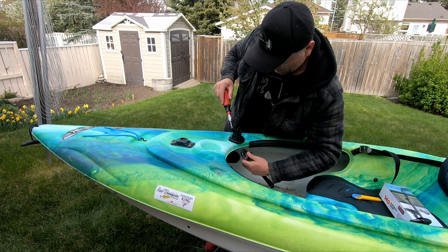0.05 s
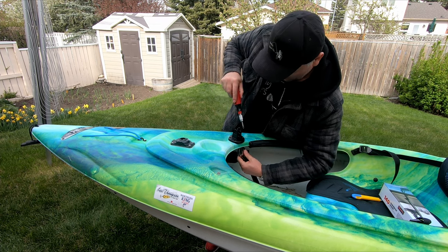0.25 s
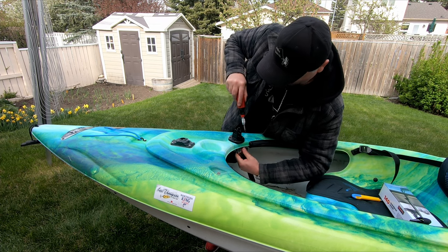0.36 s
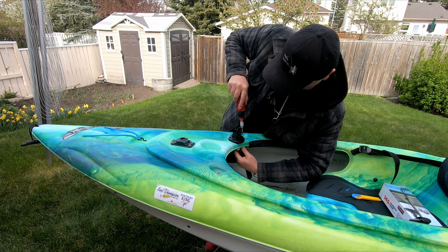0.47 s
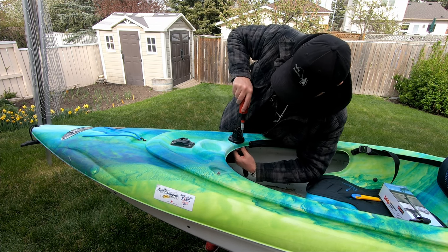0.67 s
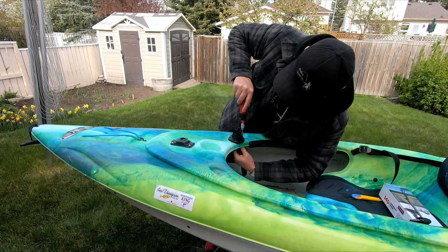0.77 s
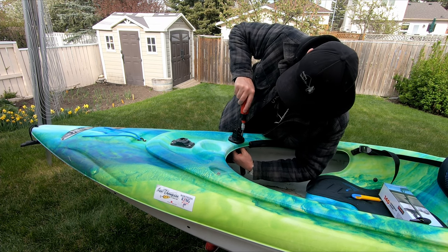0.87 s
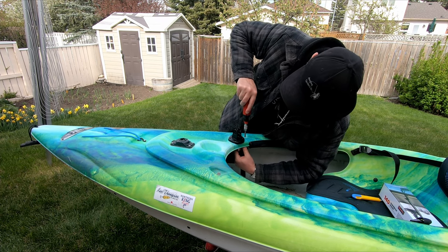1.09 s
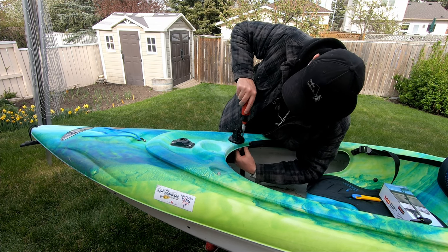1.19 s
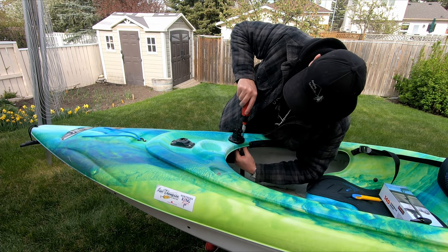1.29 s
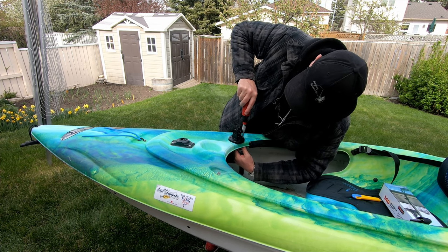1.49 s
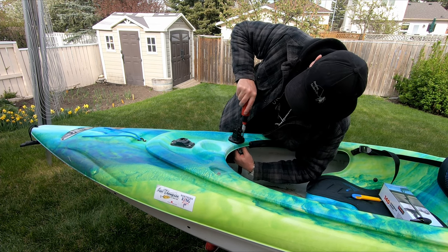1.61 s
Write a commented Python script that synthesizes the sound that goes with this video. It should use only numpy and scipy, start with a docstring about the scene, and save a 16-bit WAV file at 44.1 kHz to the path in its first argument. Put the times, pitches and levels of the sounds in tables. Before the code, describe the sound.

Sharp screwdriver clicks with hollow knocks on a plastic kayak deck outdoors.

```python
"""Faint ticks and rubbing come first, over a low hum, a town wash and a thin far whistle in a yard.
A hand presses a screwdriver into screws on a hollow plastic kayak deck. The tip clicks and slips
in the screw head, exciting short resonances of tip and deck; each knock sets the hull booming in
its normal modes; sleeve and hand rub the deck with friction noise. The kayak is heard through
two microphone ports that differ in level, phase and near echoes."""
import sys
import numpy as np
from scipy import signal
from scipy.fft import rfft, irfft
from scipy.io import wavfile
from scipy.ndimage import uniform_filter1d

SR = 44100
rng = np.random.default_rng(int(sys.argv[2]) if len(sys.argv) > 2 else 0)


def waveform_to_disk(signal):
    """Save audio, clipped to [-1, 1], as 16-bit WAV at the path in sys.argv[1]."""
    frames = np.transpose(np.atleast_2d(signal))
    scaled = np.clip(frames, -1, 1) * 32767
    samples = np.round(scaled).astype(np.int16)
    wavfile.write(sys.argv[1], SR, samples)


N = 72765

# normal modes of the hull: f/Hz, level/dB, t60/s, build-up/s
HULL_MODES = [(81.9, -7.5, 0.34, 0.011), (107.7, -18, 0.47, 0.017), (155.9, -4, 0.26, 0.0071),
              (186.9, -10.5, 0.17, 0.019), (235, -8.5, 0.084, 0.011), (282.3, -13, .1, 0.009),
              (317.5, -16, 0.14, 0.009), (356.5, -22.5, 0.057, 0.0029), (465.7, -21, 0.084, 0.0057),
              (534.7, -20.5, 0.036, 0.0024), (691, -26.5, 0.068, 0.00068)]


def amp(db):
    return 10 ** (np.asarray(db) / 20)


def unit_rms(x):
    return x / np.sqrt(np.mean(x ** 2) + 1e-20)


def at_frequency(points, hz):
    f, value = np.transpose(points)
    return np.interp(np.log(hz + 1), np.log(f + 1), value)


def over_time(table, column):
    rows = np.array(table)
    return np.interp(np.arange(N) / SR, rows[:, 0], rows[:, column])


def add(mix, start_s, sound):
    part = mix[round(start_s * SR):][:len(sound)]
    part += sound[:len(part)]


def filtered(x, gain):
    """Linear filtering: the spectrum of x, mirrored at its ends, is multiplied by gain(f)."""
    padded = np.concatenate([x[..., 1024:0:-1], x, x[..., -2:-1026:-1]], axis=-1)
    size = padded.shape[-1]
    return irfft(rfft(padded) * gain(np.fft.rfftfreq(size, 1 / SR)), size)[..., 1024:-1024]


def causal_filter(x, gain):
    """Causality: a minimum-phase filter of unit RMS gain answers only after it is struck."""
    log_gain = np.log(np.maximum(unit_rms(gain), 1e-6))
    log_response = np.conj(signal.hilbert(np.r_[log_gain, log_gain[-2:0:-1]]))[:len(gain)]
    return irfft(rfft(x) * np.exp(log_response), len(x))


def lorentzian(hz, centre_hz, width_hz):
    """Power response of a damped resonance."""
    return 1 / (1 + (2 * (hz - centre_hz) / width_hz) ** 2)


def resonate(x, hz, width_hz):
    """Forced vibration of one damped resonance of gain 1."""
    phasor = np.exp(2j * np.pi * hz * np.arange(len(x)) / SR)
    pole = np.exp(-np.pi * width_hz / SR)
    return 2 * (phasor * signal.lfilter([1 - pole], [1, -pole], x / phasor)).real


def town_wash():
    """Partial coherence: patchy town noise is alike left and right only at low frequencies."""
    spectrum = [(35, -15), (60, 0), (90, -17), (146, -9.5), (300, -24.5), (599, -36), (777, -24.5),
                (945, -32.5), (1430, -33.5), (2250, -44), (2860, -43.5), (3120, -46), (3470, -49),
                (5200, -54.5), (7270, -59), (9000, -59.5), (10700, -80), (12000, -89.5), (15000, -97)]  # town noise: f/Hz, relative level/dB
    coherence = [(60, .96), (130, .88), (290, .6), (430, .34), (640, .08)]  # likeness of the two sides: f/Hz, correlation
    balance = [(60, -1), (400, -1.5), (1400, -3), (3100, -3), (4700, 0)]  # left minus right: f/Hz, level/dB
    frames, hz = N // 256 + 5, np.fft.rfftfreq(1024, 1 / SR)
    a, b, c, d, patches = rng.standard_normal((frames, 513, 5)).T
    patches = uniform_filter1d(patches, size=12, axis=0)  # across frequency
    patches = unit_rms(uniform_filter1d(patches, size=14, axis=1))  # across time
    alike = at_frequency(coherence, hz)[:, None]
    left = a + 1j * b
    right = alike * left + np.sqrt(1 - alike ** 2) * (c + 1j * d)
    pan_db = at_frequency(balance, hz)[:, None] / 2
    level_db = at_frequency(spectrum, hz)[:, None] + 2.2 * patches
    spectra = np.array([left, right]) * amp([level_db + pan_db, level_db - pan_db])
    return amp(-54.5) * unit_rms(signal.istft(spectra, nperseg=1024, noverlap=768)[1][:, :N])


def low_hum(hz=46, waver_hz=4.2):
    """Random frequency modulation: a low tone wavers as its level rises and falls."""
    levels = [(0.0, -58), (0.032, -54.5), (0.372, -43.5), (0.422, -80), (0.472, -36), (0.536, -42),
              (0.564, -52.5), (0.61, -48), (0.648, -59), (1.378, -48.5), (1.396, -52), (1.65, -53.5)]  # hum envelope: t/s, level/dB
    drift = unit_rms(uniform_filter1d(rng.standard_normal(N), size=4000))
    phase = 2 * np.pi * np.cumsum(hz + waver_hz * drift) / SR
    return np.sqrt(2) * np.sin(phase) * amp(over_time(levels, 1))


def far_whistle(start_s=0.4, end_s=1.5, hz=3107, width_hz=33, level_db=-81):
    """Narrow-band noise is heard as a pitch; it swells and fades."""
    progress = np.clip((np.arange(N) / SR - start_s) / (end_s - start_s), 0, 1)
    band = resonate(resonate(rng.standard_normal(N), hz, width_hz), hz, width_hz)
    return amp(level_db) * np.sqrt(np.sin(np.pi * progress)) * unit_rms(band)


def rubbing():
    """Sliding friction: fine grains scrape in three bands; slower shoves drive the hull modes."""
    # sleeve and hand on the deck: t/s, level/dB of low, mid and high scrape, relative rumble level/dB
    levels = [(0, -91, -105, -100, -74), (.18, -77, -100, -100, -70), (.23, -66, -78, -94, -68),
              (.32, -68.5, -95.5, -104, -62), (.43, -65, -78, -100, -66), (.52, -74, -65, -87, -53),
              (.62, -65.5, -82, -94, -68), (.67, -66, -73.5, -79.5, -60), (.74, -72, -71.5, -82, -54.5),
              (.79, -72.5, -91, -89.5, -63.5), (.83, -73.5, -84, -100, -48.5),
              (.87, -64.5, -70.5, -103, -66), (.91, -64, -76.5, -106, -64), (.96, -102, -105, -102, -53),
              (1.015, -61.5, -68.5, -96, -65), (1.13, -66, -74, -90, -66), (1.19, -70, -92, -100, -70),
              (1.29, -65, -90, -106, -74), (1.4, -61.5, -79, -89, -65.5), (1.46, -70, -77.5, -100, -58),
              (1.54, -62, -89, -122, -57), (1.65, -71, -77, -100, -57.5)]
    spectrum = [(240, -49.5), (400, -0.5), (965, -6.5), (1540, -4.5), (1750, -14), (2060, -11.5),
                (3200, -18), (3570, -19), (3880, -22), (4270, -20.5), (6190, -21), (8160, -11),
                (10700, -40.5), (14000, -71.5), (22000, -120)]  # scrape: f/Hz, relative level/dB
    grains = rng.standard_normal(N) * amp(1.92 * rng.exponential(1, N // 40 + 1).repeat(40)[:N])
    shove = filtered(rng.standard_normal(N), lambda hz: 1 / (1 + (hz / 450) ** 4))
    rumble = sum(amp(db) * resonate(shove, hz, 1.06 / t60) for hz, db, t60, _ in HULL_MODES)
    out = unit_rms(rumble) * amp(over_time(levels, 4) - 4.5)
    for column, (low_hz, high_hz) in enumerate([(300, 2500), (2500, 6200), (6200, 11000)], 1):
        band = filtered(grains, lambda f: amp(at_frequency(spectrum, f)) * (f > low_hz) * (f <= high_hz))
        out += unit_rms(band) * amp(over_time(levels, column))
    return out


def hull_knock(level_db, nominal_hz, swell_s, deep_db, upper_db):
    """Modal superposition: hull modes build up and ring out as the dented deck bonks, sinking in pitch."""
    t = np.arange(SR // 3) / SR
    pitch_hz = 1.1577 * nominal_hz / (1 + 11.76 * t)
    swell = (t / swell_s * np.exp(1 - t / swell_s)) ** 1.255
    bonk = swell * np.sin(2 * np.pi * np.cumsum(pitch_hz) / SR)
    boom = np.zeros(len(t))
    for k, (hz, db, t60, build_s) in enumerate(HULL_MODES):
        mode_db = db + deep_db * (hz < 135) + upper_db * (hz > 250)
        envelope = amp(mode_db - 60 * t / t60) * (1 - np.exp(-t / build_s)) ** 2
        boom += (-1) ** k * envelope * np.sin(2 * np.pi * hz * t)
    return amp(level_db - 2.5) * (bonk + boom)


def tip_click(level_db, ring_hz, ring_db, bite_db, treble_db, burst_t60):
    """Impact excitation: a gritty burst drives tip and deck, with a steel crack and one short ring."""
    tip_spectrum = [(240, -32), (400, 1.5), (478, -6), (841, -9), (1270, -8), (1630, -10), (2240, -16),
                    (2640, -11.5), (3770, -20), (4040, -20), (6450, -26.5), (8270, -33.5), (10700, -48.5),
                    (14000, -77.5), (22000, -120)]  # slipping tip: f/Hz, relative level/dB
    deck_modes = [(580, 92, 4.5), (674, 21, 2), (1077, 29, -3), (1244, 185, 2.5), (1940, 100, 5),
                  (2576, 270, -0.5), (3455, 180, 3.5), (4250, 340, 1.5), (5120, 600, 4), (8300, 210, -13)]  # resonances under the tip: f/Hz, bandwidth/Hz, level/dB
    crack_spectrum = [(2000, -15), (4300, 4), (6300, -18.5), (8300, 2), (10500, -7.5), (11500, -19.5),
                      (14000, -31.5), (16000, -55.5)]  # first touch of steel on steel: f/Hz, relative level/dB
    rise_s, tail_t60, crack_t60, puff_t60 = 0.00092, 0.14, 0.013, 0.0088
    treble_lift_db, bite_lift_db = treble_db + 26.5, bite_db + 13.5
    slip_noise, grit_noise, touch_noise = rng.standard_normal((3, 6000))
    t, hz = np.arange(6000) / SR, np.fft.rfftfreq(6000, 1 / SR)
    rise = 1 - np.exp(-t / rise_s)

    shelf = np.clip(4 * np.log2(hz / 5000 + 1e-9), 0, 1)
    lift_db = treble_lift_db * shelf + bite_lift_db * lorentzian(hz, 4280, 2170) ** 2
    deck = 1 + sum(amp(db) * lorentzian(hz, f, width) for f, width, db in deck_modes)
    colour = amp(at_frequency(tip_spectrum, hz) + lift_db) * deck
    grit = amp(3 * unit_rms(uniform_filter1d(grit_noise, size=30)))
    decay = grit * amp(-60 * t / burst_t60) + amp(-10 - 60 * t / tail_t60)
    burst = causal_filter(slip_noise * rise * decay, colour)

    touch = touch_noise * rise * amp(-18 + treble_lift_db - 60 * t / crack_t60)
    crack = causal_filter(touch, amp(at_frequency(crack_spectrum, hz)))

    puff = np.convolve(touch_noise * rise ** 2 * amp(-60 * t / puff_t60), np.hanning(9), "same")
    ring = resonate(puff, ring_hz, width_hz=400)
    ring = resonate(ring, ring_hz, width_hz=900)  # steepens the skirts
    return amp(level_db) * (.5 * (burst + crack) + amp(ring_db) * ring / abs(ring).max())


def microphone_ports(x, echo_t60=.015):
    """Spaced receivers: two ports differ in level and phase, and each catches its own near echoes."""
    balance = [(60, -1.5), (230, -1.5), (520, -3), (690, -6), (1180, -5), (2660, -6.5), (3480, -6.5),
               (4570, .5), (7850, 3), (10300, -3)]  # direct sound, left minus right: f/Hz, level/dB
    left_lead = [(0, 0), (520, -.3), (2760, -.5), (4050, -.3), (4700, -1.1), (5510, -2.9), (6500, -3),
                 (7580, -4.9), (8270, -5.9), (9220, -6.8), (11000, -6.6)]  # direct sound, left minus right: f/Hz, phase/rad
    echo_spectrum = [(100, -40), (300, -22), (600, -7), (2000, -7), (8000, -7), (12000, -3)]  # incoherent echoes: f/Hz, relative level/dB

    def left_gain(hz):
        return amp(at_frequency(balance, hz) / 2) * np.exp(.5j * at_frequency(left_lead, hz))

    t = np.arange(2048) / SR
    response = rng.standard_normal((2, len(t))) * amp(-60 * t / echo_t60)
    echoes = signal.fftconvolve(x[None], response / np.linalg.norm(response[0]), axes=1)[:, :N]
    direct = np.array([filtered(x, left_gain), filtered(x, lambda hz: 1 / left_gain(hz))])
    return direct + filtered(echoes, lambda hz: amp(at_frequency(echo_spectrum, hz)))


def scene():
    """Superposition: rubbing, clicks and knocks on the kayak add to the background of the yard."""
    # tip in the screw head: t/s, level/dB, ring f/Hz, ring level/dB, bite level/dB (neutral at -13.5),
    # treble level/dB (neutral at -26.5), burst t60/s
    clicks = [(0.077, -75, 1970, -11.5, 2, -23, 0.014), (0.133, -67, 1720, -16, -10, -5.5, 0.023),
              (0.199, -59.5, 2200, -9, -14, -9.5, 0.02), (0.208, -51.5, 1850, -28.5, -20, -23, 0.025),
              (0.456, -17, 1890, -17, -22.5, -26, 0.017), (0.478, -29, 2090, -13, -16, -20, 0.027),
              (0.507, -28.5, 3950, -12.5, -8, -11.5, 0.02), (0.518, -34.5, 1970, -6, -17.5, -41, 0.075),
              (0.537, -35, 2150, -8, -15, -20, 0.025), (0.546, -34.5, 2670, -8, -15, -28, 0.025),
              (0.567, -41.5, 1910, -12, -23, -35, 0.0083), (0.653, -39.5, 2030, -26, -18.5, -28.5, 0.025),
              (0.66, -41, 3220, 0, -12.5, -27.5, 0.018), (0.709, -46.5, 1970, -4.5, -17, -26, 0.0083),
              (0.733, -60, 2030, -10, -16, -11, 0.0086), (0.885, -47, 1750, -18.5, -20, -49.5, 0.019),
              (1.023, -28.5, 1690, -10, -21, -23, 0.022), (1.067, -38.5, 1740, -12, -20, -31, 0.058),
              (1.082, -45.5, 1930, 3.5, -13, -17, 0.042), (1.092, -35.5, 1820, -9, -16, -27, 0.065),
              (1.097, -43, 1850, -28, -10, -29, 0.042), (1.109, -43.5, 2160, 2, -24, -22, 0.016),
              (1.139, -56, 2120, 3, -24, -36, 0.011), (1.227, -69, 2250, 9, -20, -53, 0.037),
              (1.247, -30.5, 1930, -14, -23.5, -31.5, 0.016), (1.312, -52.5, 2300, 4.5, -11, -24, 0.075),
              (1.339, -33, 2000, -6.5, -11, -23.5, 0.033), (1.346, -33.5, 1920, -16, -24.5, -47, 0.025),
              (1.358, -48.5, 1870, 2, -27, -34, 0.025), (1.394, -50.5, 2220, -1, -22, -54, 0.011),
              (1.475, -41, 2280, -8.5, -11.5, -20, 0.023)]
    # blows on the hull: t/s, level/dB, nominal f/Hz, swell/s, deep-mode gain/dB, upper-mode gain/dB
    knocks = [(0.202, -29, 96.6, 0.0064, -4.5, 3.5), (0.214, -29.5, 119.4, 0.0057, -6, -8),
              (0.25, -29, 105.9, 0.015, 2.5, -4.5), (0.277, -39, 106, 0.0092, -5.5, 1),
              (0.461, -16, 189.9, 0.0078, -2.5, -11), (0.471, -17, 147, 0.0067, -0.5, -18),
              (0.489, -23, 144, 0.015, -6.5, 2), (0.514, -22, 197, 0.011, -18.5, 7.5),
              (0.543, -15.5, 180.3, 0.0116, -1.5, -2.5), (0.6, -30, 181.7, 0.0073, -5.5, 1),
              (0.65, -35, 232.8, 0.018, -17.5, 6.5), (0.661, -23.5, 157.3, 0.0068, -4, 5),
              (0.689, -33.5, 128.2, 0.008, 3, 8), (0.728, -40, 180.4, 0.012, 1, 5),
              (0.856, -36, 235.4, 0.016, -15, 0), (0.87, -39.5, 212.4, 0.016, 5.5, 11.5),
              (0.912, -44, 210, 0.015, -9, 11), (1.026, -19.5, 180.6, 0.011, -7.5, -5.5),
              (1.07, -38.5, 176.4, 0.014, -5, -10), (1.088, -30.5, 204, 0.0094, -21, -15),
              (1.109, -37, 157, 0.0083, -10.5, 0), (1.146, -43, 206, 0.0052, -4, -21),
              (1.25, -20, 183.2, 0.0095, 1.5, 1), (1.277, -30, 101.6, 0.006, -14, 6),
              (1.311, -30, 96, 0.02, -31, 5.5), (1.339, -27.5, 193, 0.0076, 3.5, 11.5),
              (1.361, -31.5, 180.7, 0.015, 2.5, 11), (1.398, -36.5, 101.3, 0.017, 0, 11.5),
              (1.479, -29.5, 178, 0.0098, 2.5, -1), (1.52, -37.5, 110, 0.0043, -14, 2),
              (1.608, -44, 185.3, 0.012, 16, -18)]
    kayak = rubbing()
    yard = town_wash() + low_hum() + far_whistle()
    for start_s, *click in clicks:
        add(kayak, start_s, tip_click(*click))
    for start_s, *knock in knocks:
        add(kayak, start_s, hull_knock(*knock))
    return microphone_ports(kayak) + yard


def record(dry, cutoff_hz=15000):
    """Band limiting: a linear-phase low-pass removes the highest treble."""
    taps = signal.firwin(511, cutoff_hz, window=("kaiser", 9), fs=SR)
    return signal.oaconvolve(dry, taps[None], "same")


dry = scene()
out = record(dry)
waveform_to_disk(out)
```